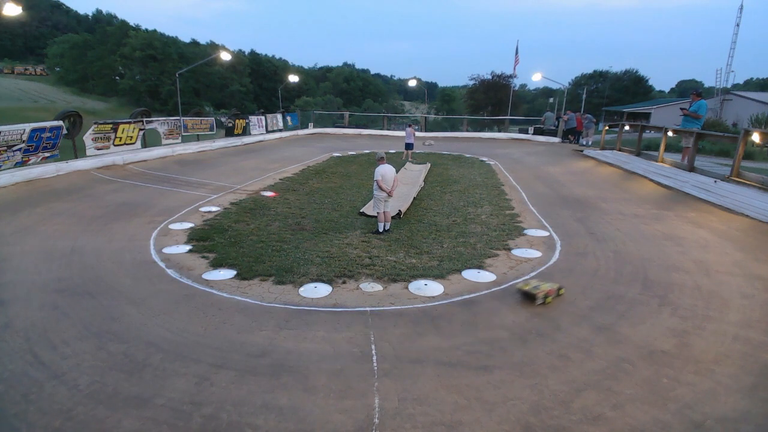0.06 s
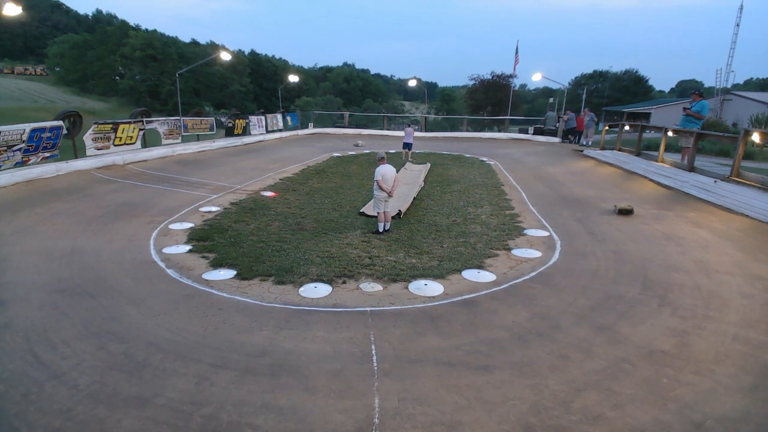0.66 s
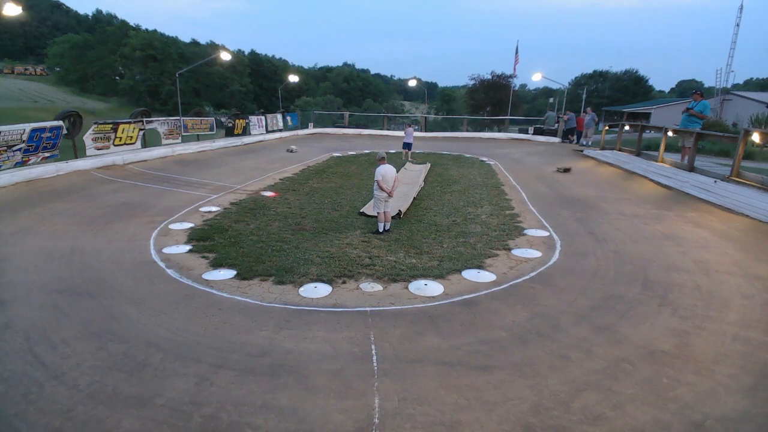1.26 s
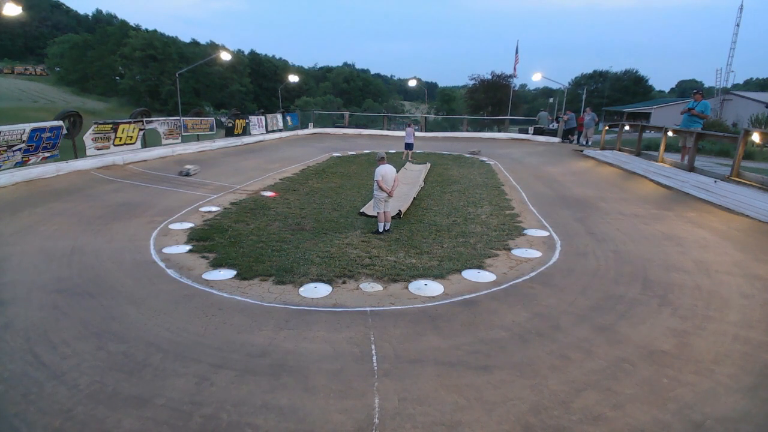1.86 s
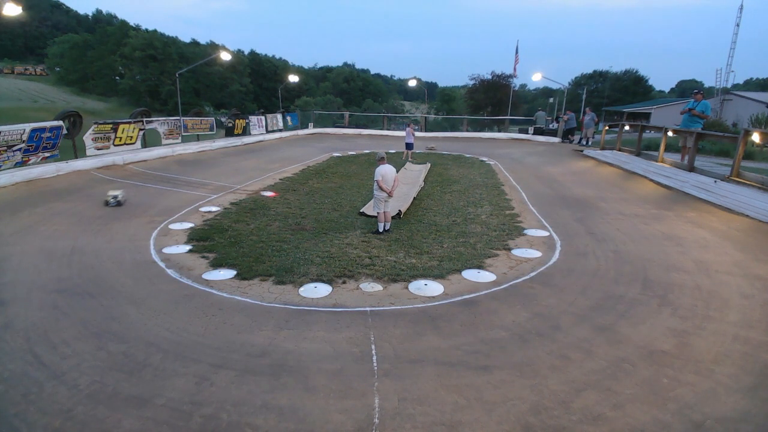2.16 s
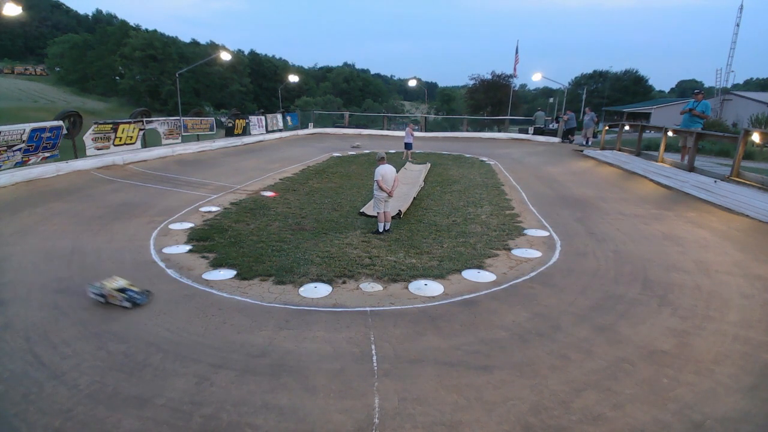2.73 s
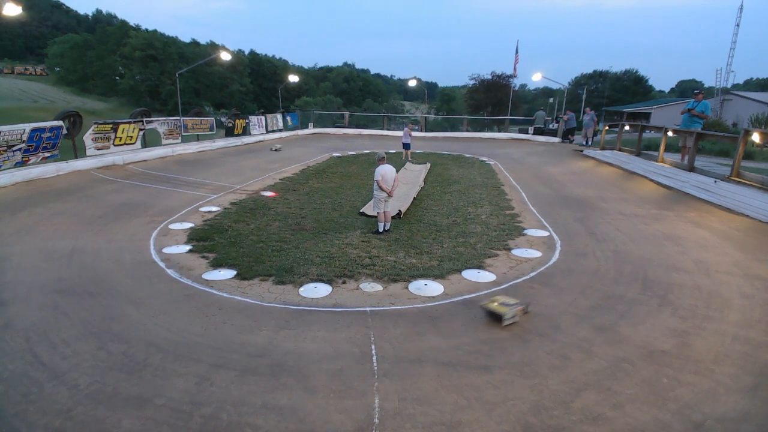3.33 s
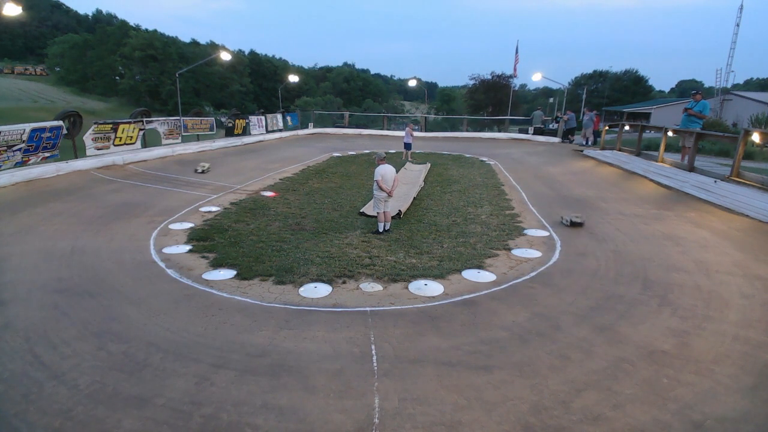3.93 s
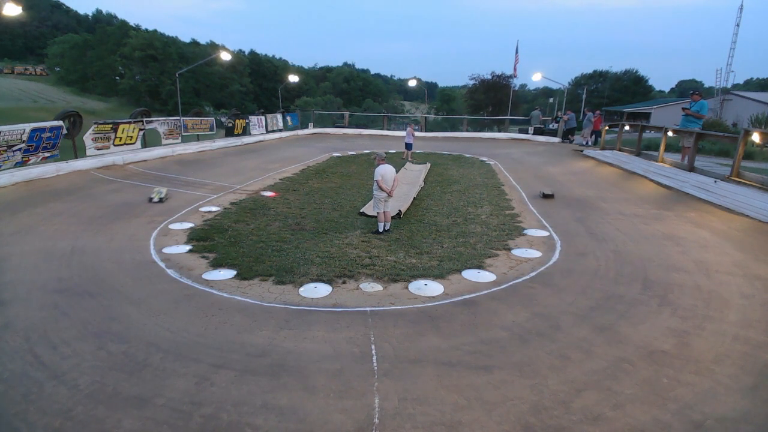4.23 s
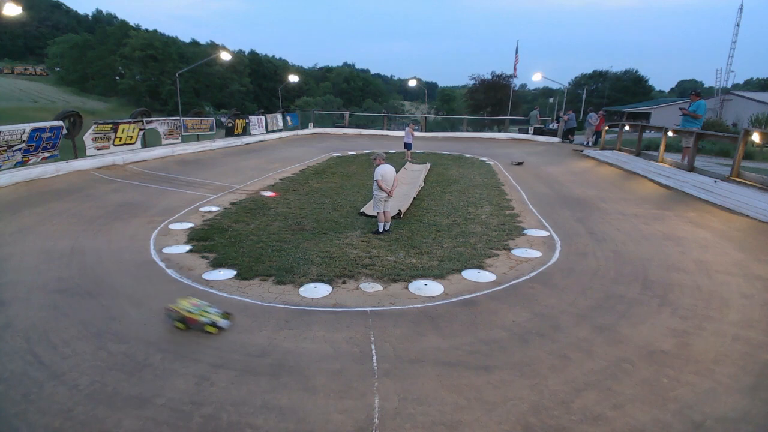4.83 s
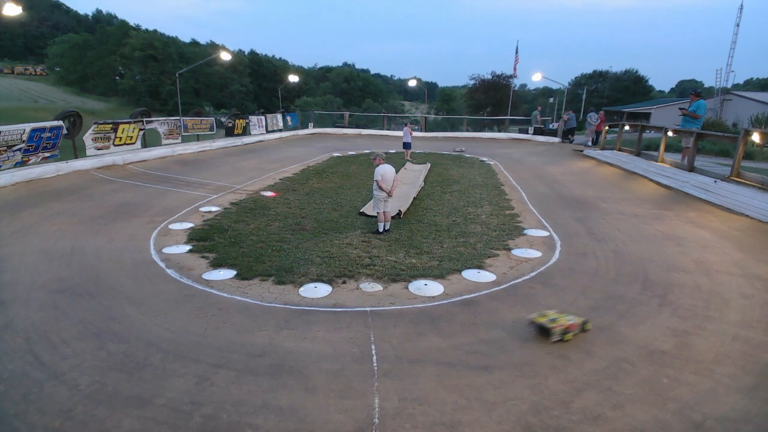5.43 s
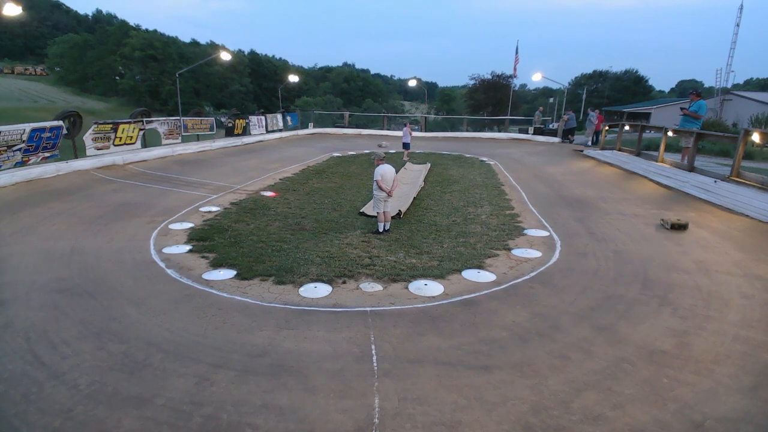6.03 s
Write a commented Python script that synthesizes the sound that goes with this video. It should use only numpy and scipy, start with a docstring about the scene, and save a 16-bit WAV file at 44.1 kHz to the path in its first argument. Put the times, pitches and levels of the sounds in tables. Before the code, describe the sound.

Small electric radio-controlled cars race on an outdoor dirt oval, heard mostly to the left with a short echo. From the start, one car's high, raspy gear whine climbs in pitch, spraying grit, and fades by about 1.6 seconds. A second whine rises, cuts back around 2.1 seconds, returns lower, drops out briefly near 3 seconds, then surges close by, fluttering and jumping in pitch as the wheels slip until about 4 seconds. It climbs and fades by 5 seconds. A third car overlaps from 3.7 seconds, falls in pitch towards 5 seconds, then accelerates loudly with a rising whine to the end. Gear chatter and the hiss of tyres on dirt follow each pass. Faint motor tones come from across the track around 2.5 to 3.3 seconds. Soft evening air and a low electrical hum continue underneath, with light breeze rumbles near 5 and 6 seconds.

```python
"""Three small electric race cars whine round a dirt oval, sweeping through the near turn one by one.
Their spur gears sing with the throttle, flutter as the tyres hop and jump in pitch when a wheel slips.
The chassis rasp as the gears chatter; the tyres roll and spray grit. Boards round the track scatter
the whine. Behind it sit faint whines from across the track, evening air, a breeze and a mains hum."""
import sys
import numpy as np
from scipy import signal
from scipy.fft import rfft, irfft, next_fast_len
from scipy.io import wavfile
from scipy.ndimage import uniform_filter1d, map_coordinates

SR = 44100
rng = np.random.default_rng(int(sys.argv[2]) if len(sys.argv) > 2 else 0)


def dump(signal):
    """Clip the signal to [-1, 1] and save it as 16-bit WAV at the path in sys.argv[1]."""
    limited = np.clip(np.atleast_2d(signal).T, -1, 1)
    pcm = np.round(limited * 32767).astype(np.int16)
    wavfile.write(sys.argv[1], SR, pcm)


N = 272593

# Throttle moves of the near passes and the far stretches: time_s, mesh_hz, level_db, roughness (0-1)
LEADER = [(0, 5960, -23.5, 0.3), (.08, 5384, -34, 0.4), (.23, 5853, -28, 0.08), (.38, 6160, -31, 0.65),
          (.5, 6470, -25.5, 0.74), (.78, 6527, -24.5, 0.7), (1.02, 6844, -27, 0.53),
          (1.55, 6987, -31.5, .35), (1.66, 7120, -42, 0.4)]
SECOND = [(1.64, 7130, -45, .07), (1.72, 7190, -33.5, 0.076), (1.92, 7475, -28.5, 0.21),
          (2.03, 7400, -33, 0.35), (2.1, 6700, -64, 1), (2.28, 4950, -40, 0.52), (2.38, 5760, -42.5, 0.29),
          (2.55, 6050, -36, 0.19), (2.67, 5940, -30, 0.53), (2.89, 5594, -32.5, 0.38),
          (2.94, 5360, -69, .5), (3.02, 5320, -56, 0.45), (3.07, 5500, -23.5, .6), (3.44, 5672, -24, 0.32),
          (3.88, 5770, -34, 0.35), (4.22, 6403, -25.5, 0.03), (4.7, 6764, -33, 0.091),
          (4.9, 6640, -36.5, .13)]
THIRD = [(3.68, 6650, -30.5, 0.94), (3.88, 7050, -32, 0.3), (4.22, 7450, -34, .65),
         (4.73, 6237, -41.5, 0.84), (5.01, 4597, -39.5, 0.95), (5.06, 4828, -31.5, 0.53),
         (5.2, 5806, -24, 0.53), (5.35, 5802, -28.5, .45), (5.46, 5384, -33, 0.42),
         (5.6, 5676, -25.5, 0.41), (5.82, 6220, -25.5, 0.32), (5.96, 6630, -25, 0.65),
         (6.08, 6550, -25, 0.7), (6.18, 6240, -28, .5)]
FAR_TURN = [(2.86, 6250, -41, .2), (2.96, 6500, -34.5, 0.27), (3.04, 6330, -35.5, 0.31),
            (3.18, 6956, -31, 1), (3.3, 7150, -48, 0.85)]  # the third car, from far away
FAR_STRAIGHT = [(5.08, 6900, -34, 1), (5.33, 7230, -35.5, .7), (5.45, 6620, -34.5, 0.46),
                (5.62, 6620, -54, 0.6)]  # the leader, from far away
# Each pass or stretch by name: throttle table, apex_s (when the car is at the apex of the near turn)
CARS = {"leader": (LEADER, -0.197), "second": (SECOND, 3.15), "third": (THIRD, 5.12),
        "far turn": (FAR_TURN, 5.24), "far straight": (FAR_STRAIGHT, 6.7)}
FULL_THROTTLE_DB = -25  # whine of a near car flat out


def amp(db):
    """Decibels to gain."""
    return 10 ** (np.asarray(db) / 20)


def unit(x):
    """Scaled to rms 1."""
    return x / np.sqrt(np.mean(np.abs(x) ** 2) + 1e-20)


def along(points, hz):
    """Read (hz, value) points joined on a log frequency axis."""
    knots_hz, values = np.transpose(points)
    return np.interp(np.log(hz + 1), np.log(knots_hz + 1), values)


def curves(rows):
    """One automation curve for each column after the time."""
    time_s, *columns = np.transpose(rows)
    return [np.interp(np.arange(N) / SR, time_s, column) for column in columns]


def gate(rows):
    """1 from the first row's time to the last, with short fades outside."""
    start_s, end_s = rows[0][0], rows[-1][0]
    return np.interp(np.arange(N) / SR, [start_s - .02, start_s, end_s, end_s + 0.19], [0, 1, 1, 0])


def swell(centre_s, length_s):
    """A smooth bump from 0 to 1 and back."""
    return np.cos(np.pi * np.clip((np.arange(N) / SR - centre_s) / length_s, -.5, .5)) ** 2


def wobble(rate_hz):
    """A smooth random curve, rate_hz knots a second."""
    return map_coordinates(rng.standard_normal(N // 8), [np.arange(N) * rate_hz / SR + 3], mode="wrap")


def phase(hz):
    """Running phase of a gliding pitch, from a random start."""
    return 2 * np.pi * (np.cumsum(hz) / SR + rng.random())


def filtered(x, response):
    """EQ x with a gain that is a function of frequency."""
    size = next_fast_len(N + 8192)
    return irfft(rfft(x, size) * response(np.fft.rfftfreq(size, 1 / SR)), size)[..., :N]


def rush(spectrum, patchy_db):
    """Coloured stereo noise of rms 1 with patches of random gain, widest in the treble."""
    # Likeness of left and right: frequency_hz, correlation
    likeness = [(30, 0.44), (250, 0.83), (1000, 0.71), (3000, 0.088), (12000, 0.063)]

    def mid_side_eq(hz):
        width = np.arccos(np.clip(along(likeness, hz), -1, 1)) / 2
        return amp(along(spectrum, hz)) * [np.cos(width), np.sin(width)]

    bins = signal.stft(rng.standard_normal((2, N)), nperseg=512)[2]
    patches = uniform_filter1d(rng.standard_normal(bins.shape[1:]), size=5, axis=0)
    patches = unit(uniform_filter1d(patches, size=10, axis=1))
    noise = signal.istft(bins * amp(patchy_db * patches), nperseg=512)[1][:, :N]
    mid, side = filtered(noise, mid_side_eq)
    return unit(np.array([mid + side, mid - side]))


def at_ports(x, bearing_deg, spacing_s=0.00019):
    """Pan by the delay between two microphone ports; the pair faces backwards."""
    lag = spacing_s * SR * np.sin(np.radians(bearing_deg)) / 2
    return np.array([map_coordinates(x, [np.arange(N) + way * lag], order=3) for way in (1, -1)])


def throttle(name):
    """Mesh pitch, whine level and roughness of a car; each wheel slip lifts pitch and level."""
    # A driven wheel slips, races and grips again: centre_s, car, length_s, speed_rise (share), swell_db
    slips = [(0.534, "leader", 0.085, 0.011, 1), (0.692, "leader", .12, 0.012, 1.5),
             (2.719, "second", .1, 0.044, 2.5), (2.842, "second", .09, .07, 6),
             (3.108, "second", .075, .09, 1.5), (3.263, "second", 0.11, 0.17, 3),
             (3.396, "second", .1, .115, 5.5), (3.537, "second", .14, .085, 3),
             (3.686, "second", 0.14, 0.11, 5.5), (3.808, "second", 0.059, .055, 7),
             (4.009, "second", 0.059, .025, 3), (5.193, "third", 0.037, 0.021, 4.5),
             (5.255, "third", 0.079, .025, 1.5), (5.315, "third", 0.069, 0.0056, 2.5),
             (5.764, "third", 0.058, 0.052, 1)]
    mesh_hz, level_db, roughness = curves(CARS[name][0])
    for centre_s, car, length_s, speed_rise, swell_db in slips:
        if car == name:
            slip = swell(centre_s, length_s) ** .55
            mesh_hz = mesh_hz * (1 + speed_rise * slip)
            level_db = level_db + swell_db * slip
    return mesh_hz, level_db, np.clip(roughness, 0, 1)


def lap(name):
    """A car's curves along the line they all take; its tail beams out the octave of the gears."""
    # Racing line: from_apex_s, bearing_deg (to the right), distance_m, hop_hz, flutter (share), octave_db
    racing_line = [(-2.5, -1, 16, 30, 0.00982, -70), (-1.18, -29, 13, 28, 0.0101, -67),
                   (-0.5, -46, 8.1, 38, .014, -60), (-0.38, -43, 6.5, 42, 0.0293, -44.5),
                   (0, 3.5, 4.8, 43, 0.03383, -42), (0.32, 34, 5, 42, 0.02844, -44),
                   (1.06, 38, 12, 42, 0.0247, -46), (0.93, 34.5, 12, 30, .012, -45),
                   (1.7, 27, 9.2, 28, 0.011, -49)]
    apex_s = CARS[name][1]
    return curves([(apex_s + from_apex_s, *rest) for from_apex_s, *rest in racing_line])


def gear_whine(name, orders, bounce, octave_db, flank_db):
    """One car's spur gears: their speed flutters as the tyres hop, and worn teeth roughen the tone."""
    # Body shell resonances that radiate the octave and the other orders: frequency_hz, gain_db
    shell = [(950, -3.5), (1130, -12), (1350, -0.5), (1650, -5.5), (1850, -2), (2020, -10), (2300, 5),
             (2650, -0.5), (3350, 2), (3850, -2.5), (4420, 4), (4750, -0.5), (5300, -43), (7000, 0),
             (8200, 2), (9500, -14), (10800, -1.5), (11500, -3.5), (12200, -11.5), (13100, -6.5),
             (14200, -20)]
    mesh_hz, level_db, roughness = throttle(name)
    bearing_deg, _, hop_hz, flutter, tail_db = lap(name)
    hop = np.sin(phase(hop_hz * (1 + 0.0807 * wobble(18))))
    mesh_phase = phase(mesh_hz * (1 + bounce * flutter * (hop + 0.48 * wobble(130))))
    shaft_phase = mesh_phase / 24  # pinion teeth
    # an off-centre pinion presses harder once a turn, and every bump changes the load
    pinion_db = 1.9 * np.sin(shaft_phase + wobble(84))
    load = unit(amp(pinion_db + 42 * bounce * flutter * hop + 1.4 * wobble(55)))

    def partial(order, noisy_share):
        """A multiple of the mesh pitch; uneven tooth contacts smear a share of it into noise."""
        noisy_share = np.clip(noisy_share, 0, 1)
        width_hz = 650 * order ** .4
        scrape = unit(wobble(width_hz) + 1j * wobble(width_hz))
        texture = np.sqrt(1 - noisy_share) + np.sqrt(noisy_share) * scrape
        return np.sqrt(2) * np.real(np.exp(1j * order * mesh_phase) * texture)

    whine = load * amp(level_db) * partial(1, roughness)
    effort_db = level_db - FULL_THROTTLE_DB
    coasting_db = 1.4 * np.minimum(effort_db + 12, 0)  # the octave dies when the car coasts
    beam_db = tail_db + octave_db + coasting_db + along(shell, 2 * mesh_hz)
    whine += amp(beam_db + 2.9 * wobble(50)) * partial(2, .5 * roughness + 0.4)
    # the other orders swell less, and come and go; the shell's flank faces us at bearing 0
    drivetrain_db = -19.5 + 0.67 * effort_db + flank_db * np.exp(-(bearing_deg / 17) ** 2)
    for order, trim_db in orders:
        order_db = drivetrain_db + trim_db + along(shell, order * mesh_hz) + 2.2 * wobble(14)
        whine += amp(order_db) * partial(order, .8 * roughness + 0.15)
    return at_ports(whine * gate(CARS[name][0]), bearing_deg)


def race():
    """The gears of three cars: their near passes and two faint stretches of whine from across the track."""
    # Other drivetrain partials: order (multiple of the mesh), leader_db, second_db, third_db, far_db
    partials = [(.162, -30.5, -33, -30, -26), (.254, -25, -24.5, -25.5, -34), (.323, -32, -33.5, -35, -56),
                (.507, -27.5, -27.5, -27.5, -40), (.6, -33.5, -34, -33.5, -20.5),
                (.758, -24, -25, -24.5, -11), (1.165, -21.5, -42, -20, -44)]
    orders, leader, second, third, far = np.transpose(partials)
    return (gear_whine("leader", zip(orders, leader), bounce=0.635, octave_db=3, flank_db=-11)
            + gear_whine("second", zip(orders, second), bounce=1.35, octave_db=1, flank_db=-1.5)
            + gear_whine("third", zip(orders, third), bounce=.55, octave_db=3, flank_db=-5.5)
            + gear_whine("far turn", zip(orders, far), bounce=1.094, octave_db=-8, flank_db=-6)
            + gear_whine("far straight", zip(orders, far), bounce=1.8, octave_db=-9, flank_db=15))


def board_echoes(x):
    """The boards round the track and the ground scatter a short stereo tail."""
    # Decay of the tail: frequency_hz, t60_s
    decay = [(300, 0.42), (6000, 0.14), (14000, 0.76)]
    hz, time_s, bins = signal.stft(rng.standard_normal((2, SR // 2)), SR, nperseg=256)
    fade = amp(-60 * time_s / along(decay, hz)[:, None])
    tail = signal.istft(bins * fade, SR, nperseg=256)[1]
    return signal.fftconvolve(x, tail / np.linalg.norm(tail[0]), axes=1)[:, :N]


def chassis_rasp(car_db=-30.5, field_db=-39.5):
    """The chassis rasp as the gears chatter, over a bed from the rest of the field."""
    # Colour of the rasp: frequency_hz, density_db
    spectrum = [(2500, -19.5), (4000, -17.5), (4900, -9.5), (5250, -5.5), (5700, -1), (6100, 3),
                (6600, 0.5), (7300, -1.5), (8300, -37), (9500, -12), (12000, -65)]
    power = amp(field_db) ** 2
    for name, (drive, _) in CARS.items():
        _, level_db, roughness = throttle(name)
        effort_db = level_db - FULL_THROTTLE_DB
        power += gate(drive) * roughness * amp(car_db + 0.8 * effort_db) ** 2
    envelope = np.sqrt(power) * amp(0.53 * wobble(60))
    return envelope * unit(rush(spectrum, patchy_db=3.1) * amp(0.66 * wobble(600)))


def flying_grit(car_db=-40.5, field_db=-48.5, air_loss_hz=12000):
    """Grit flies with the throttle and in slides; from across the track it arrives duller."""
    # Colour of the grit: frequency_hz, density_db
    spectrum = [(3000, -13.5), (5000, -2.5), (8400, 5), (9700, -4), (11200, -3), (13300, -13), (14200, -27),
                (15500, -62)]
    # Sprays thrown up by a sliding car: centre_s, length_s, level_db
    sprays = [(0.536, 0.13, -38.5), (0.673, .18, -38.5), (3.484, .25, -42), (5.067, 0.051, -34),
              (5.997, 0.25, -38)]
    power = sum(swell(centre_s, length_s) * amp(db) ** 2 for centre_s, length_s, db in sprays)
    for name, (drive, _) in CARS.items():
        effort_db = np.minimum(throttle(name)[1] - FULL_THROTTLE_DB, 0)
        power += gate(drive) * amp(car_db + 0.58 * effort_db) ** 2
    envelope = np.sqrt(power) * amp(0.86 * wobble(40))
    grains = unit(rush(spectrum, patchy_db=2.7) * amp(2.8 * wobble(1500)))
    far_grit = filtered(rush(spectrum, patchy_db=1.3), lambda hz: 1 / (1 + (hz / air_loss_hz) ** 10))
    return envelope * grains + amp(field_db) * far_grit


def tyre_roll(at_1m_db=-31.5, field_db=-49):
    """Tyres rolling on dirt, louder as a car comes close."""
    # Colour of the roll: frequency_hz, density_db
    spectrum = [(150, 3), (500, 1.5), (1000, 6), (1500, 1), (2300, 1), (3300, 0), (4500, 5), (7000, -14),
                (12000, -120)]
    power = amp(field_db) ** 2
    for name, (drive, _) in CARS.items():
        distance_m = lap(name)[1]
        power += gate(drive) * (amp(at_1m_db) / distance_m) ** 2
    return np.sqrt(power) * rush(spectrum, patchy_db=0.9)


def evening_air(air_db=-44.5, breeze_db=-53):
    """Open air rustles, and puffs of breeze rumble on the microphone."""
    # Colours of the open air and the wind buffet: frequency_hz, density_db
    air_spectrum = [(12, -32), (20, -27), (65, -2), (126, -9.5), (313, -12.5), (399, -13.5), (436, -11),
                    (664, -15.5), (1080, -21), (1410, -17), (1580, -26), (2570, -22.5), (4000, -49),
                    (5200, -71), (8800, -120)]
    buffet_spectrum = [(12, 3.5), (22, 10), (27, 5), (33, 22), (45, -10), (80, 1), (130, -30), (600, -120)]
    # Puffs of breeze: centre_s, length_s, rumble_change_db, rustle_change_db
    gusts = [(1.0, 2.4, 3.5, -1), (4.45, 0.56, -0.5, 2), (5.078, 0.36, 16, -1.5), (5.948, 0.28, 13, -1.5)]
    rumble_db, rustle_db = sum(np.outer(changes_db, swell(centre_s, length_s))
                               for centre_s, length_s, *changes_db in gusts)
    air = filtered(rush(air_spectrum, patchy_db=1.38), lambda hz: 1 / (1 + (hz / 3200) ** 4))
    buffet = amp(breeze_db + rumble_db + 0.5 * wobble(3.5)) * rush(buffet_spectrum, patchy_db=-1)
    return amp(air_db + rustle_db) * air + buffet


def mains_hum():
    """The slightly unsteady hum of floodlights and distant machines."""
    # Hum tones: pitch_hz, level_db
    tones = [(50, -54), (60, -50.5), (100, -54.5), (240, -73), (360, -64)]
    return sum(amp(db + 0.33 * wobble(7.3)) * np.sqrt(2) * np.sin(phase(hz + 0.56 * wobble(3.104)))
               for hz, db in tones)


def distant_motors():
    """Two thin, wavering motor tones across the track: one brakes, then one pulls away."""
    # Motor glides: time_s, pitch_hz, level_db
    braking = [(2.44, 4350, -58), (2.5, 3980, -50), (2.6, 3700, -55), (2.7, 3420, -44), (2.78, 3090, -46)]
    pulling = [(2.85, 1927, -62), (2.93, 2056, -52.5), (3.08, 2154, -54), (3.16, 2130, -54)]
    motors = np.zeros((2, N))
    for glide, bearing_deg in (braking, -32), (pulling, 3.6):
        pitch_hz, level_db = curves(glide)
        tone = np.sqrt(2) * np.sin(phase(pitch_hz * (1 + 0.01203 * wobble(150))))
        motors += at_ports(amp(level_db) * gate(glide) * tone, bearing_deg)
    return motors


def scene():
    """The whine and its echoes, the running noise and the evening bed."""
    whine = race() + distant_motors()
    echoes = amp(-7.5) * board_echoes(whine)
    running_noise = chassis_rasp() + flying_grit() + tyre_roll()
    return whine + echoes + running_noise + evening_air() + mains_hum()


def record(dry):
    """Lean the mix well to the left and cut the very top."""
    # Left level over right: frequency_hz, lead_db
    left_lead = [(60, 6), (120, 8), (240, 11), (480, 10.0), (950, 11), (1890, 10.5), (3770, 10.5),
                 (7520, 9.5), (15000, 4.5)]
    top_hz = 15650

    def balance(hz):
        gains = np.array([amp(along(left_lead, hz)), np.ones_like(hz)])
        return gains / np.sqrt(np.mean(gains ** 2, axis=0)) * (hz < top_hz)

    return filtered(dry, balance)


dry = scene()
out = record(dry)
dump(out)
```